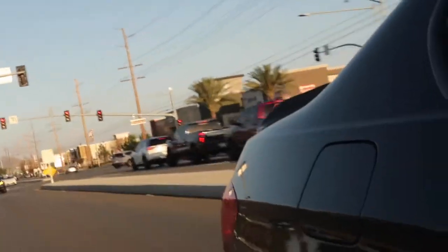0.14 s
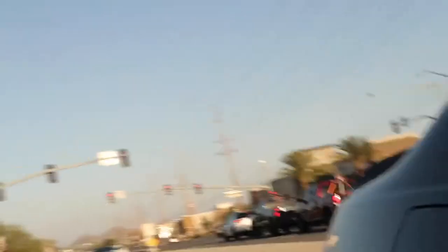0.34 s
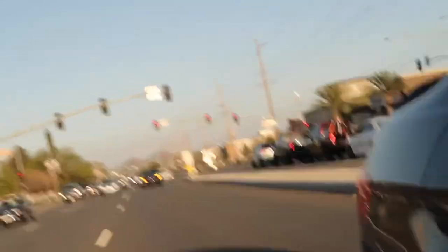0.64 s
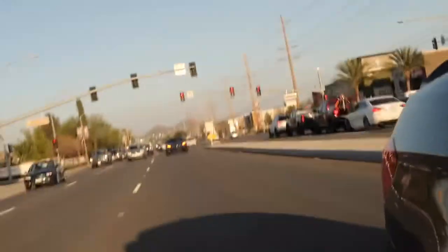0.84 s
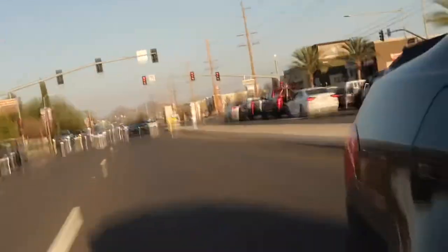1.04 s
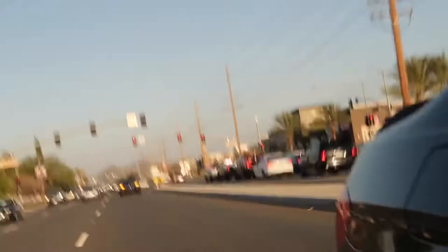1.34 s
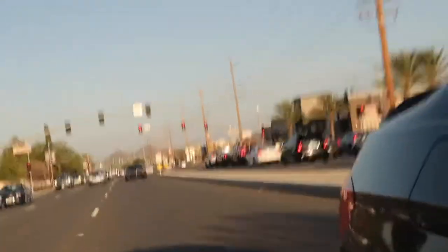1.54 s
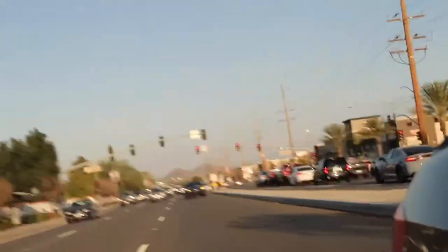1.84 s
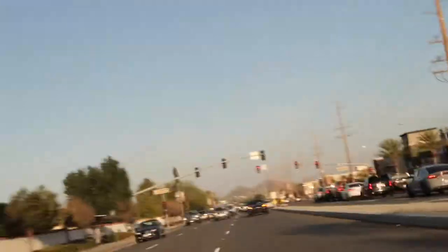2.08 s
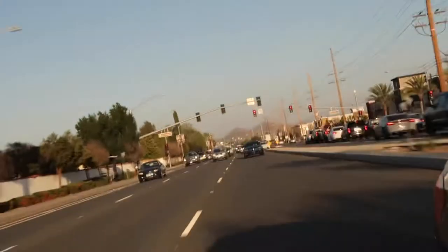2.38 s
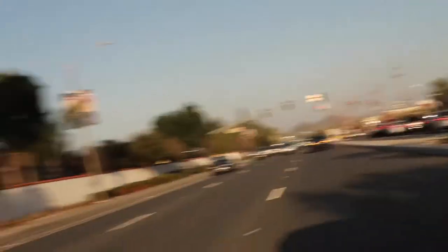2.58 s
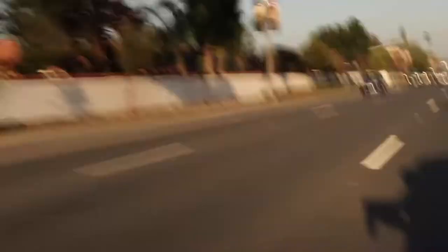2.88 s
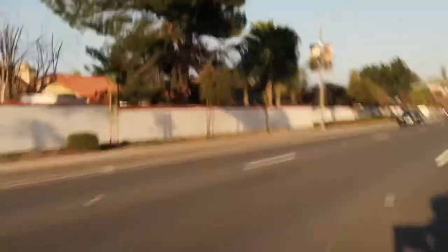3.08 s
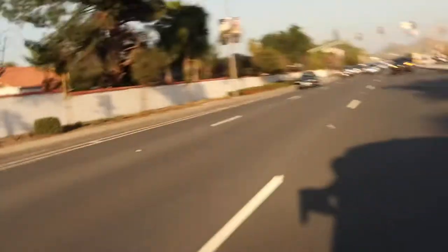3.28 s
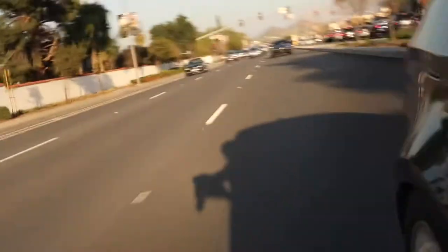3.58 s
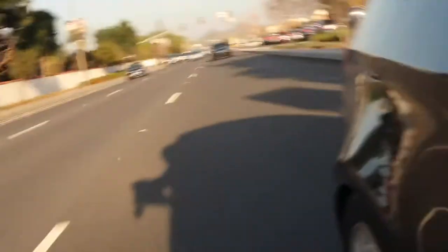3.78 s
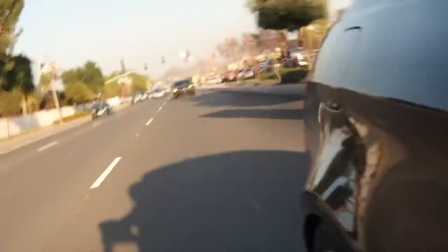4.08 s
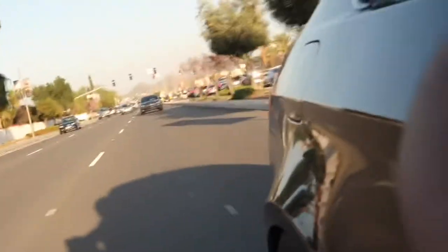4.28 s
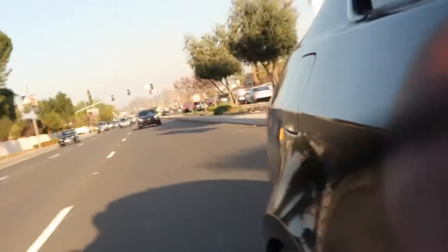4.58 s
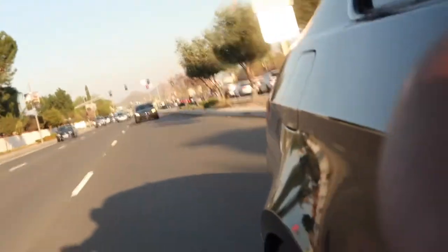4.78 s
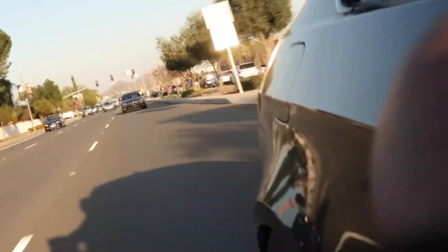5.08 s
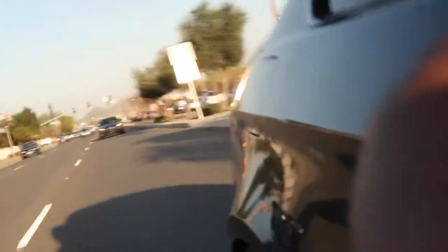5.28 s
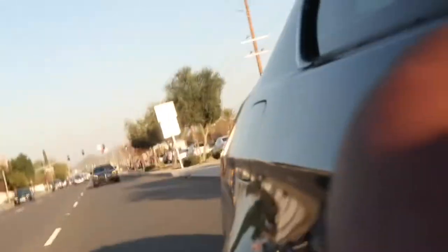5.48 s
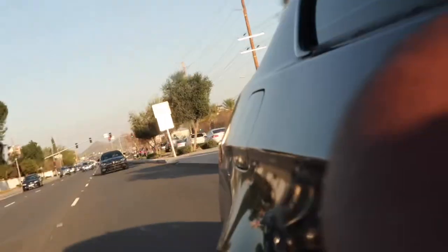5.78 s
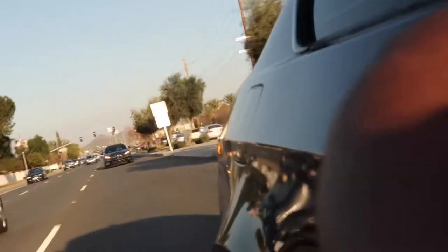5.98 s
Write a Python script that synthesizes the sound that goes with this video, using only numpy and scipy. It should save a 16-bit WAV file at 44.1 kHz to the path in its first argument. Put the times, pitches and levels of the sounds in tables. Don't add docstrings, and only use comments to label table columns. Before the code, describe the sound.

Steady wind roars across a microphone held out of a moving car, then dulls into broken, buffeting puffs with rumbling, crackles and knocks.

```python
import sys
import numpy as np
from scipy import signal
from scipy.fft import rfft, irfft, next_fast_len
from scipy.io import wavfile
from scipy.ndimage import uniform_filter1d, map_coordinates

SR = 44100
rng = np.random.default_rng(int(sys.argv[2]) if len(sys.argv) > 2 else 0)


def inscribe(sig):
    pcm = np.round(np.clip(np.atleast_2d(sig).T, -1, 1) * 32767)
    wavfile.write(sys.argv[1], SR, pcm.astype(np.int16))


def convert_level_to_amplitude(level_db):
    exponent = np.asarray(level_db, float) / 20
    return 10 ** exponent


N = 270597

# time [s], gust [dB], shelter [0-1].
FLOW = [(0, 1, 0.13), (.5, 0, 0), (1.0, 1.5, 0.17), (1.5, 1.5, 0.05), (2.03, 1, 0), (2.3, 1.5, 0.04),
        (2.85, 2, 0), (3.06, 4.5, 0.18), (3.1, -1, 0.51), (3.4, 0, 0.4), (3.678, 0, 0.65),
        (3.69, -5.5, 0.9), (3.995, -5.5, 0.84), (4.04, 1.5, 0.79), (4.25, 3, 0.98), (5.1, 1.5, 0.98),
        (5.7, -1.4, 0.99), (6.14, 0, 0.96)]
# centre [s], level [dB], half length [ms].
SWELLS = [(.005, 3.5, 7), (0.161, 2, 54), (.135, 0, 10), (.24, 1, 14), (.31, -1, 22), (.345, -0.5, 7.9),
          (.385, 1.5, 9.4), (.43, -1.5, 14), (.47, 1, 20), (.55, 0.5, 21), (.62, -1, 13), (.7, 0.5, 26),
          (.84, 2, 21), (.94, 2, 19.4), (1.0, -1, 13), (1.1, 0, 25), (1.25, 0.5, 36), (1.4, -0.5, 25),
          (1.52, 1, 39), (1.65, -0.5, 36), (1.77, -2, 6.4), (1.899, 1, 42), (2.015, -2, 20), (2.201, 1, 30),
          (2.45, -0.5, 68), (2.6, -0.5, 44), (2.84, -2, 9.2), (2.99, -1, 13), (3.168, 3, 17),
          (3.2, -2, 8.9), (3.32, 4, 7.5), (3.42, 2.5, 32), (3.49, -1, 4.3), (3.51, 1.5, 12),
          (3.56, 1.5, 18), (3.66, -1.5, 13)]
# shelter [0-1], buffet [dB], rumble [dB], rush [dB], hiss [dB].
LAYERS = [
    (0, -55.5, -36, -22.5, -26.5),
    (.5, -48.5, -24, -20, -34.5),
    (1, -30.5, -24, -27.5, -47.5),
]
# shelter [0-1], flutter [dB], stray eddies [per s], their crackle [dB].
BROKEN = [
    (0, 1.5, 0, -23),
    (.5, 2, 25, -17),
    (1, 2.5, 300, -25.5),
]

# frequency [Hz], density [dB per Hz].
BUFFET_COLOUR = [(20, -29), (40, -14), (70, -4.5), (120, 0.5), (180, 3.5), (280, 2), (500, -16.5),
                 (2000, -69)]
RUMBLE_COLOUR = [(40, -66), (120, -13), (200, -6.5), (300, 1.5), (450, 1.5), (620, -10.5), (1000, -12.5),
                 (3000, -54)]
RUSH_COLOUR = [(30, -89), (150, -30.5), (300, -10), (450, -1.5), (900, 0), (1400, -2.5), (2200, -6.5),
               (4000, -18), (9000, -45)]
HISS_COLOUR = [(300, -56), (1200, -8.5), (2200, -0.5), (3200, -1), (4500, -3.5), (6500, -7.5),
               (9000, -15.5), (16000, -43)]
SIZZLE_COLOUR = [(1500, -31), (4000, -7.5), (6500, -1.5), (9000, -2.5), (12000, -5.5), (14000, -8.5),
                 (15200, -28), (16000, -29)]
# frequency [Hz], density [dB per Hz].
CRACKLE_COLOUR = [(300, -48), (1000, 10), (1800, 4.5), (3000, 0), (4500, -6.5), (6500, -15), (9500, -26),
                  (16000, -61)]
THUD_COLOUR = [(50, -35), (200, -22), (400, -5.5), (800, -6), (1400, -41), (2500, -33), (6000, -55.5)]
SNAP_COLOUR = [(800, -25), (2500, -4), (5000, -4), (8000, -13), (11000, -10.5), (14000, -19), (16000, -30)]
KNOCK_COLOUR = [(80, -30), (250, -5.5), (500, 2.5), (1000, -2.5), (2000, -9.5), (4000, -17), (8000, -39),
                (16000, -57)]

# time [s], peak
# [dB], thud minus crackle [dB], half length [ms].
STRONG_EDDIES = [(3.729, -15.5, 8, 2.9), (3.809, -16, 1, 2.5), (3.946, -9, 5, 4.6), (4.153, -3, 8.5, 0.62),
                 (4.17, -2, -20, 0.72), (4.237, -7, -5, 1.1), (4.313, -23, 6, 1.46), (4.352, -17, 8, 0.89),
                 (4.413, 0, 8, 1.5), (4.534, -2, -2, 1.5), (4.637, -8, 4, 1.2), (4.712, -38, 1, 1.1),
                 (4.733, -3, -6, 1.2), (4.769, -5, -7, 1.1), (5.02, -3, -6, 1.5), (5.112, -12.5, -3, 1.5),
                 (5.15, -12, 4, 0.82), (5.18, -35, 4, 0.89), (5.35, -7, -6, 1.6), (5.508, -4, 15, 4.9),
                 (5.546, 2, -2, 0.94), (5.622, -12, 23, 1.51), (5.697, -10, 18.5, 1.6),
                 (5.73, -13, -14, 1.04), (5.748, -20, -9, 1.6), (5.806, -2.5, -12, 2.2), (5.95, -10, 12, 1.1),
                 (5.977, -10, 3, 3.5), (6.001, -2.5, 13, 2.9), (6.086, -7, -2, 0.91),
                 (3.26, -13, -3, 1.1), (3.349, -5, 2, 1), (3.424, -16, 0, 1.3), (3.533, -18, 3, 1.3),
               (3.644, -12, 7, 1.6), (3.668, -12, 14, 0.92), (3.892, -22, 6, 1.7), (4.041, -11, -1, 3),
               (4.075, 4, 0, 0.84), (4.492, 2, -2, 2.2), (4.853, -8, 16, 1.2), (4.945, -21, 1, 1.1),
               (5.238, -13, -7, 2.3), (5.272, -12, -18, 1.8), (5.436, -7, -17, 2.7), (5.849, -12, 4, 1.15),
               (5.931, -14, 15, 1.1), (6.117, -4, 1, 0.95)]
# time [s], peak above 9 kHz [dB].
SNAPS = [(3.3438, -47), (3.4244, -47), (3.5344, -42), (3.6391, -46), (3.6646, -48), (3.7284, -52),
         (3.8033, -58), (3.866, -52), (3.9025, -52), (3.9449, -50), (4.0153, -49), (4.0282, -46),
         (4.0392, -40), (4.076, -34), (4.114, -38), (4.124, -32), (4.2373, -44), (4.2464, -45),
         (4.2654, -54), (4.3216, -47), (4.354, -40), (4.4134, -43), (4.4892, -40), (4.4887, -35),
         (4.51, -39), (4.5506, -34), (4.6269, -36), (4.6354, -37), (4.7331, -48), (4.7676, -42),
         (4.7964, -53), (4.8449, -50), (4.953, -43), (4.9634, -49), (5.104, -41), (5.1224, -45),
         (5.1674, -54), (5.1896, -57), (5.236, -50), (5.2644, -51), (5.2739, -43), (5.3512, -42),
         (5.3916, -44), (5.436, -45), (5.4464, -39), (5.5132, -30), (5.6151, -43), (5.6994, -46),
         (5.7483, -53), (5.7658, -56), (5.8054, -58), (5.853, -40), (5.8965, -50), (5.914, -50),
         (5.9279, -50), (6.0392, -56), (6.0876, -53), (6.118, -42)]
# centre [s], level [dB], half length
# [ms].
PUFFS = [(3.697, -14, 2.2), (3.732, 0, 5.1), (3.76, 1, 4.0), (3.775, 3.5, 1.9), (3.791, 1, 2),
         (3.807, -1, 2.8), (3.828, 2, 3.1), (3.857, -2, 4), (3.868, -5, 2.7), (3.907, 4.5, 4.1),
         (3.93, 2, 4.3), (3.947, -1, 3), (3.986, 2, 2.4), (4.018, 4, 0.93), (4.027, -3, 3.3),
         (4.041, -14, 4.0), (4.062, -10, 2.4), (4.077, -10, 3.27), (4.089, 0, 2.6), (4.126, -4, 4.1),
         (4.155, 1, 3.7), (4.175, 3.5, 2.46), (4.202, 0, 8.9), (4.224, -3, 2.6), (4.243, 1, 9.4),
         (4.263, -0.5, 4.2), (4.287, -4, 2.674), (4.3, -8, 1.7), (4.313, 7, 2.2), (4.323, 6.5, 1.5),
         (4.341, 0, 1.5), (4.353, 4, 1.8), (4.379, 0, 2), (4.386, 1, 1.9), (4.397, -6, 3.6),
         (4.416, -1, 9.7), (4.47, 1, 7.8),
         (4.493, -4, 5.8), (4.512, -8, 2.1), (4.533, -6, 4.4), (4.553, 2, 2.2), (4.574, -4, 6),
                (4.603, 0.5, 2.8), (4.639, 0, 4), (4.655, 0.5, 3), (4.667, -1, 2.4), (4.681, 1.5, 2.3),
                (4.703, -11, 2.1), (4.714, 5, 1.62), (4.735, 4.5, 4.2), (4.746, 8, 1.5), (4.77, 5, 2),
                (4.785, -6, 4.2), (4.799, 5, 1), (4.81, -10, 3.8), (4.821, 1, 1.4), (4.832, 0, 5.9),
                (4.847, 2, 3.1), (4.867, 0.5, 8.9), (4.897, 0, 1.7), (4.948, -7, 2.74), (4.979, 3, 1.2),
                (4.989, 0, 1.7), (5.024, 2.5, 6.2), (5.072, -1, 2.7), (5.086, -5, 4.7), (5.105, 1, 3.4),
                (5.115, 8.5, 2.5), (5.128, 0.5, 4.6), (5.152, -1, 1.9), (5.163, 5, 0.86), (5.187, 4, 7),
                (5.209, 3, 3.8), (5.227, -1, 2.9),
         (5.237, 8, 4.5), (5.25, 1.5, 3), (5.274, -1.5, 13.5), (5.326, -0.5, 4.5), (5.364, 2.5, 9),
              (5.393, 0, 11), (5.437, 7, 11), (5.469, 2, 8), (5.49, 10, 4), (5.51, 12.5, 5),
              (5.532, 2.5, 8), (5.547, 1, 7), (5.568, 6, 6), (5.587, -4, 14), (5.627, 2.5, 5.5),
              (5.655, -1, 10), (5.679, -6, 9), (5.702, -12, 1), (5.714, -6, -1), (5.734, -7, -8),
              (5.753, 3, 1.5), (5.766, -2, 3), (5.78, 0, 0.5), (5.806, 1.5, 15), (5.835, 3.5, 4.5),
              (5.847, 7, 5), (5.875, -1, 2), (5.889, 1, 1), (5.906, -1.5, 8), (5.932, 8.5, 2),
              (5.951, -3, 6), (5.963, -1, 4), (5.976, 15, 2), (6.003, 3.5, 4), (6.03, -1, -6),
              (6.051, -1, -3), (6.074, 0, 5.5)]
# time [s], peak [dB].
KNOCKS = [(3.728, -14), (3.806, -6), (3.903, -11), (3.945, -9), (3.981, -15), (4.016, -13), (4.039, -12),
          (4.152, -9), (4.283, -12), (4.311, -5), (4.35, -2), (4.412, -8), (4.489, -17), (4.532, -10),
          (4.571, -11), (4.636, -3), (4.711, -7), (4.732, -7), (4.768, -6), (4.856, -5), (4.944, -6),
          (5.021, -1), (5.067, -8), (5.112, -2), (5.148, -6), (5.182, -9), (5.273, -11), (5.309, -9),
          (5.351, -7), (5.432, -9), (5.506, -1), (5.545, -4), (5.566, -10), (5.622, -8), (5.699, -13),
          (5.732, -15), (5.748, -10), (5.784, -13), (5.803, -10), (5.83, -13), (5.928, -12), (5.95, -10),
          (6.0, -7), (6.027, -19), (6.049, -15), (6.085, -2)]
# start [s], end [s].
SPELLS = [(3.34, 3.37), (3.41, 3.44), (3.525, 3.555), (3.62, 3.69), (3.72, 3.745), (3.79, 3.812),
          (3.85, 3.872), (3.9, 3.965), (4.015, 4.08), (4.105, 4.14), (4.222, 4.278), (4.305, 4.37),
          (4.41, 4.44), (4.485, 4.555), (4.617, 4.65), (4.722, 4.858), (4.942, 4.975), (5.085, 5.205),
          (5.232, 5.298), (5.337, 5.36), (5.38, 5.405), (5.43, 5.46), (5.5, 5.53), (5.595, 5.648),
          (5.69, 5.715), (5.74, 5.81), (5.835, 5.938), (6.03, 6.14)]


def colour(x, points):
    size = next_fast_len(N)
    hz, db = np.transpose(points)
    gain = convert_level_to_amplitude(np.interp(np.log(np.fft.rfftfreq(size, 1 / SR) + 1), np.log(hz), db))
    gain = gain / np.sqrt(np.mean(gain ** 2))
    return irfft(rfft(x, size) * gain, size)[..., :N]


def curves(table):
    s, *columns = np.transpose(table)
    return [np.interp(np.arange(N) / SR, s, c) for c in columns]


def by_shelter(table, shelter):
    depth, *columns = np.transpose(table)
    return [np.interp(shelter, depth, c) for c in columns]


def walk(rate):
    hold = max(int(SR / rate), 1)
    x = np.repeat(rng.standard_normal(N // hold + 1), hold)
    x = uniform_filter1d(uniform_filter1d(x, hold), hold)[:N]
    return x / np.std(x)


def ticks(rate, spread_db):
    chance, size = rng.random((2, N)), rng.exponential(size=(2, N))
    push = (chance < rate / SR) * 1.
    pull = (chance > 1 - rate / SR) * 1.
    x = (push - pull) * convert_level_to_amplitude(spread_db * np.minimum(size, 2.5))
    return x / np.std(x)


def patchy(x, depth_db, octaves, seconds):
    hz, s, lines = signal.stft(x, SR, nperseg=512)
    field = rng.standard_normal((64, 1024))
    grid = np.meshgrid(np.log2(hz / 60 + 1) / max(octaves, .2), s / max(seconds, .01), indexing="ij")
    gain = convert_level_to_amplitude(depth_db * map_coordinates(field, grid, order=3, mode="wrap"))
    return signal.istft(lines * gain, SR, nperseg=512)[1][..., :N]


def flow():
    gust_db, shelter = curves(FLOW)
    t = np.arange(0, N / SR, 1 / 1000)
    swells = sum(db * np.exp(-((t - s) * 1000 / max(half, 2)) ** 2 / 2) for s, db, half in SWELLS)
    swells = np.interp(np.arange(N) / SR, t, swells)
    return gust_db + swells + puffs(), np.clip(shelter, 0, 1)


def flutter(depth_db, gusts, shared, own_rate):
    shared = np.clip(shared, 0, 1)
    own = np.array([walk(own_rate), walk(own_rate)])
    swing = np.sqrt(shared) * gusts + np.sqrt(1 - shared) * own
    return convert_level_to_amplitude(depth_db * swing - depth_db ** 2 * np.log(10) / 20)


def airstream(eddy, gust_db, shelter):
    gust_share = np.array([[.6], [.95], [1.1], [0.7]])
    buffet_db, rumble_db, rush_db, hiss_db = by_shelter(LAYERS, shelter) + gust_db * gust_share
    flutter_db = by_shelter(BROKEN, shelter)[0]
    usual = uniform_filter1d(eddy, size=5000)
    surge = np.clip((uniform_filter1d(eddy, size=60) - usual) / (usual + 0.03), -1, 1.2)
    gusts = 0.13 * walk(28) + 0.6 * walk(300) + 0.31 * surge

    noise = rng.standard_normal((5, 2, N)) * np.sqrt(2)
    buffet = colour(noise[0] * convert_level_to_amplitude(buffet_db + 4.5), BUFFET_COLOUR)
    rumble_gain = flutter(1.94 * flutter_db, gusts, 0.93, 60) * convert_level_to_amplitude(rumble_db + 1.6)
    rumble = colour(noise[1] * rumble_gain, RUMBLE_COLOUR)
    rush_gain = flutter(1.2 * flutter_db, gusts, 0.39, 150) * convert_level_to_amplitude(rush_db - 0.78)
    rush = colour(noise[2] * rush_gain, RUSH_COLOUR)
    hiss_gain = flutter(0.53 * flutter_db + 0.46, gusts, 0.47, 700) * convert_level_to_amplitude(hiss_db + 1.0)
    hiss = colour(noise[3] * hiss_gain, HISS_COLOUR)
    sizzle_db = -32.0 + 1.5 * (hiss_db + 27)
    sizzle_gain = flutter(0.99 * flutter_db + 1.5, gusts, 0.66, 1500) * convert_level_to_amplitude(sizzle_db)
    sizzle = colour(noise[4] * sizzle_gain, SIZZLE_COLOUR)
    spit = colour(ticks(160, spread_db=6.0) * convert_level_to_amplitude(hiss_db - 12.0 + 1.7 * flutter_db), CRACKLE_COLOUR)
    fine = patchy(rush + hiss + sizzle, depth_db=1.56, octaves=.4, seconds=.03)
    return buffet + rumble + fine + spit


def strays(gust_db, shelter, count=800):
    _, rate, level_db = by_shelter(BROKEN, shelter)
    gap = rng.uniform(.3, 1.7, count)
    chance = rng.standard_normal((count, 3)).T
    at = np.searchsorted(np.cumsum(rate * (shelter > .2)) / SR, np.cumsum(gap))
    here = np.minimum(at, N - 1)
    peak_db = level_db[here] + 0.91 * gust_db[here] + 5 * np.clip(chance[0], -3, 1.1)
    thud_db = 2 + 2.5 * np.clip(chance[1], -2, 1.3)
    half_ms = 0.7 * np.exp(0.37 * np.clip(chance[2], -2, 1.5))
    rows = np.transpose([here / SR, peak_db, thud_db, half_ms])
    return rows[at < N]


def blows(events, lean, stretch=0.92, thud_stretch=1.27):
    crackle, thud = np.zeros((2, 2, N + SR // 10))
    ms = np.arange(-SR // 60, SR // 60) * 1000 / SR
    for (s, peak_db, thud_db, half), angle in zip(events, lean):
        start = int(s * SR) - SR // 60
        at = slice(start, start + len(ms))
        ports = np.array([[np.cos(angle)], [np.sin(angle)]])
        width = max(stretch * half, .3) * np.where(ms < 0, 0.48, 1)
        crackle[:, at] += ports * convert_level_to_amplitude(peak_db) * np.exp(-(ms / width) ** 2 / 2)
        thud[:, at] += ports * convert_level_to_amplitude(peak_db + thud_db) * np.exp(-(ms / width / thud_stretch) ** 2 / 2)
    return crackle[:, :N], thud[:, :N]


def eddies(crackle, thud, ragged_db=4.0):
    noise = rng.standard_normal((2, 2, N))
    grit = 0.76 * noise[0] * convert_level_to_amplitude(ragged_db * walk(700)) + .45 * ticks(1600, spread_db=-1.0)
    uneven = patchy(colour(grit * crackle, CRACKLE_COLOUR), depth_db=4.0, octaves=0.606, seconds=0.02)
    return convert_level_to_amplitude(4.0) * uneven + convert_level_to_amplitude(-0.5) * colour(noise[1] * thud, THUD_COLOUR)


def snaps(lean):
    half_ms = 0.31
    events = [(s + half_ms / 1000, db + 15, 0, half_ms) for s, db in SNAPS]
    spit = blows(events, lean)[0]
    return colour(rng.standard_normal((2, N)) * spit, SNAP_COLOUR)


def puffs():
    wake_s, between_db, stretch = 3.685, -3, 1.14
    t = np.arange(0, N / SR, 1 / 2000)
    power = convert_level_to_amplitude(2 * between_db)
    for s, db, half in PUFFS:
        power = power + convert_level_to_amplitude(2 * db) * np.exp(-((t - s) * 1000 / max(stretch * half, 1.5)) ** 2)
    entered = np.clip((t - wake_s) / 0.0065, 0, 1)
    return np.interp(np.arange(N) / SR, t, 10 * np.log10(power) * entered)


def knocks():
    s, db = np.transpose(KNOCKS)
    chance = rng.random((len(s), 3)).T
    size = convert_level_to_amplitude(db + 17) * np.sign(chance[0] - .5)
    at = ((s + 1.198 / 1000) * SR).astype(int)
    rebound_at = at + (SR * (.0012 + .002 * chance[2])).astype(int)
    port = (chance[1] > .5) * 1
    x = np.zeros((2, N))
    x[port, at] += size
    x[1 - port, rebound_at] -= 0.62 * size
    return colour(x, KNOCK_COLOUR)


def scene():
    gust_db, shelter = flow()
    lean = rng.uniform(0, np.pi / 2, size=900)
    strong = [(s + half / 1000, db - 16, thud_db, half) for s, db, thud_db, half in STRONG_EDDIES]
    hush_db, hush_ms = -5.5, 2.5
    ms = np.arange(N * 1000 // SR + 1)
    hush = sum(np.exp(-((s * 1000 - ms) / hush_ms - 1.3) ** 2) for s, *_ in strong)
    gust_db = gust_db + hush_db * shelter * np.interp(np.arange(N) * 1000 / SR, ms, hush)

    crackle, thud = blows(strong + list(strays(gust_db, shelter)), lean)
    crackle = .13 * np.tanh(crackle / .13)
    thud = 0.33 * np.tanh(thud / 0.29)
    eddy = np.sum(crackle + 0.51 * thud, axis=0)
    return knocks() + snaps(lean[::-1]) + airstream(eddy, gust_db, shelter) + eddies(crackle, thud)


def starve(x, mask, scatter_db, step_db, size):
    edges = np.arange(0, len(x), size)
    bands = np.add.reduceat(np.abs(x) ** 2, edges) / size
    scatter = convert_level_to_amplitude(2 * scatter_db * rng.standard_normal(bands.shape))
    limit = np.add.reduceat(mask, edges) / size * scatter
    kept = np.repeat(bands > limit, size, axis=0)[:len(x)]
    step = np.repeat(np.sqrt(limit), size, axis=0)[:len(x)] * convert_level_to_amplitude(step_db)
    return kept * step * np.floor(np.abs(x) / step + 0.29) * np.exp(1j * np.angle(x))


def squeeze(pair, size, mid_db, wide_db, top_db, scatter_db):
    frame = dict(fs=SR, nperseg=size, noverlap=size // 2, window="cosine")
    hz, s, (mid, wide) = signal.stft(pair, **frame)
    hiss = np.mean(np.abs(wide[(hz > 2500) & (hz < 7000)]) ** 2, axis=0)
    hiss = uniform_filter1d(hiss, size=2048 // size)
    loud = hiss / np.percentile(hiss, 99)
    mask = hiss * loud ** 0.38 * np.clip(hz / 2500, .01, 1)[:, None] ** 4
    mid = mid * convert_level_to_amplitude(top_db * np.sqrt(loud) * np.clip(hz / 1000 - 8, 0, 2)[:, None])
    mask = mask * convert_level_to_amplitude(-top_db * 0.3 * np.clip(hz / 1000 - 11.5, 0, 6)[:, None])
    bass = np.abs(mid) ** 2 * convert_level_to_amplitude(2 * -31.0)
    wide_mask = mask * np.sqrt(loud) * convert_level_to_amplitude(2 * wide_db) + bass
    mid = starve(mid, mask * convert_level_to_amplitude(2 * mid_db), scatter_db, step_db=5.5, size=size // 128)
    wide = starve(wide, wide_mask, scatter_db=1.5, step_db=7.0, size=size // 128)
    return signal.istft(np.array([mid, wide]), **frame)[1][:, :pair.shape[1]]


def top_cut(x):
    return signal.sosfilt(signal.butter(12, 15710, fs=SR, output="sos"), x)


def record(dry):
    top = signal.ellip(8, .2, 70, 15750, fs=SR, output="sos")
    bass_cut = signal.butter(2, 55, "high", fs=SR, output="sos")
    band = np.vstack([top, bass_cut])
    spread = signal.butter(2, 3260, "high", fs=SR, output="sos")
    ports = 0.81 * np.tanh(dry / 0.79)
    centre = (ports[0] + ports[1]) / 2
    side = convert_level_to_amplitude(6.5) * signal.sosfilt(spread, (ports[0] - ports[1]) / 2)
    lead = 509
    pair = np.pad(signal.sosfilt(band, [centre, side]), [(0, 0), (lead, 0)])
    long = squeeze(pair, size=2048, mid_db=-13.0, wide_db=-17.5, top_db=0, scatter_db=1.37)[:, lead:]
    short = squeeze(pair, size=256, mid_db=-33.5, wide_db=-26.0, top_db=-6.5, scatter_db=1.5)[:, lead:]
    t = np.arange(N) / SR
    crackling = uniform_filter1d(sum(1. * (t > a) * (t < b) for a, b in SPELLS), size=128)
    centre, side = long + crackling * (short - long)
    return top_cut(np.array([centre + side, centre - side]))


dry = scene()
out = record(dry)
inscribe(out)
```